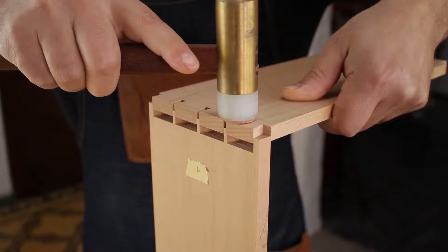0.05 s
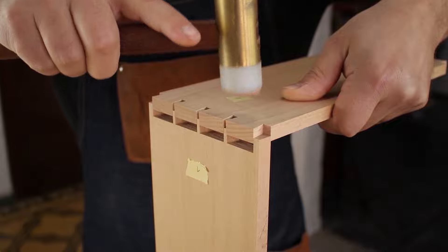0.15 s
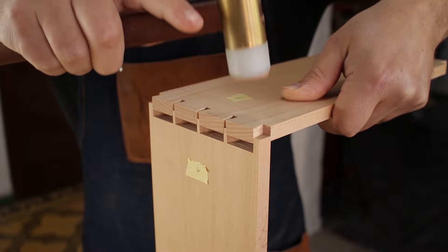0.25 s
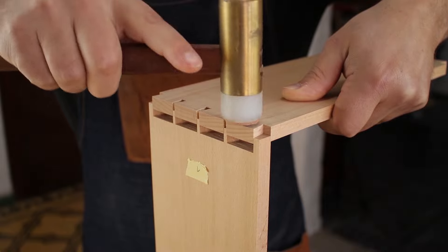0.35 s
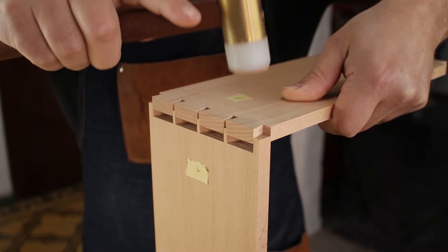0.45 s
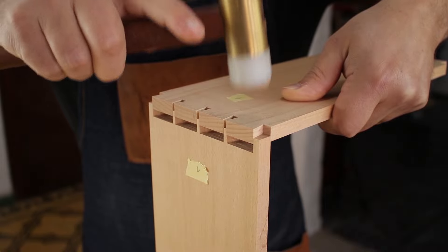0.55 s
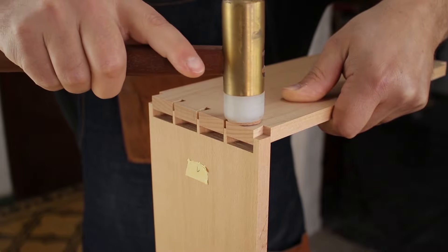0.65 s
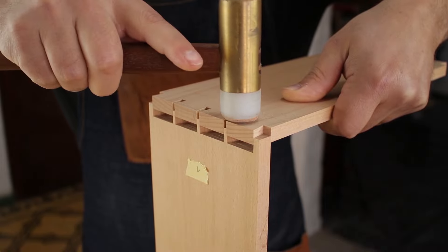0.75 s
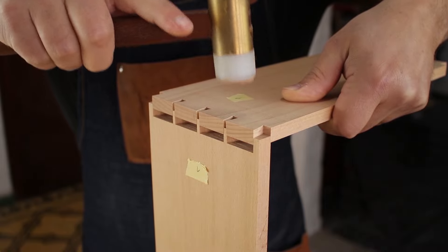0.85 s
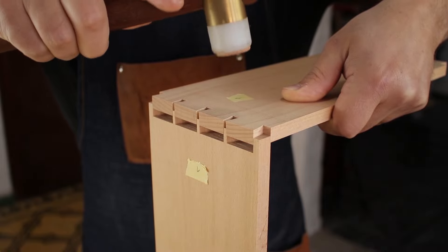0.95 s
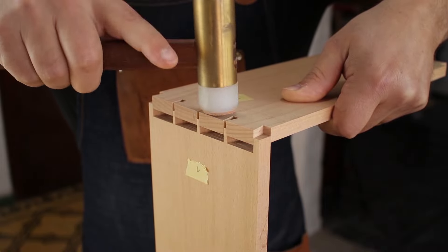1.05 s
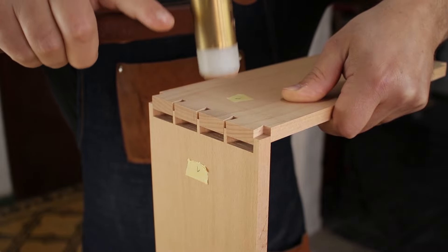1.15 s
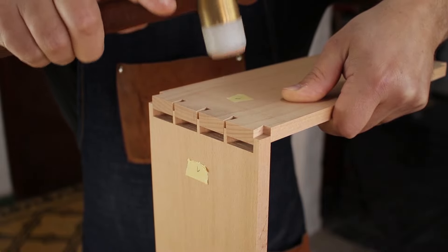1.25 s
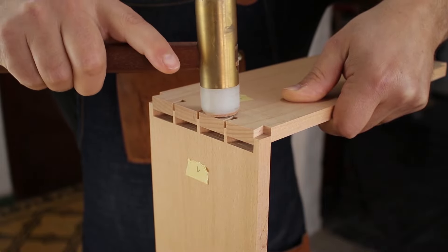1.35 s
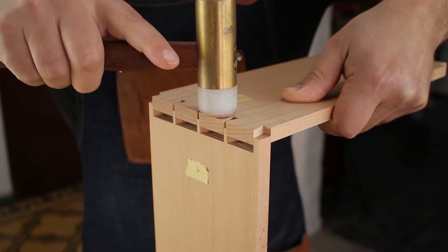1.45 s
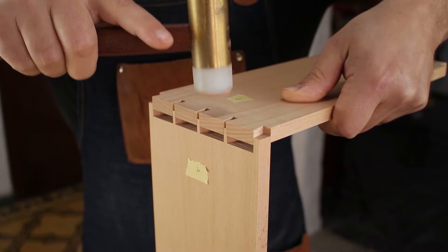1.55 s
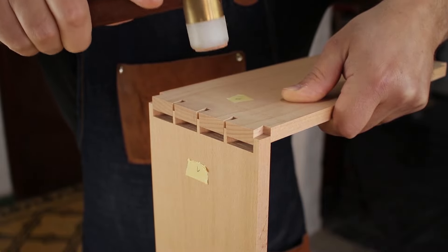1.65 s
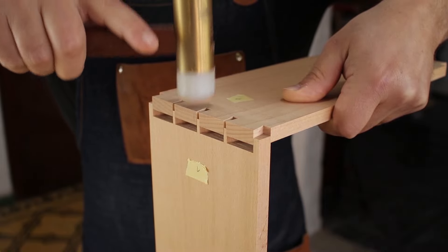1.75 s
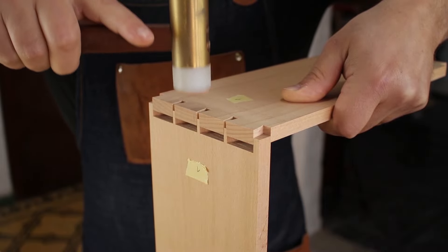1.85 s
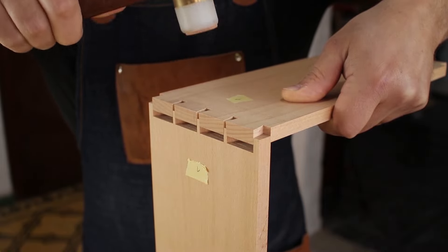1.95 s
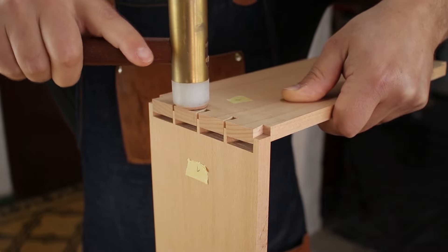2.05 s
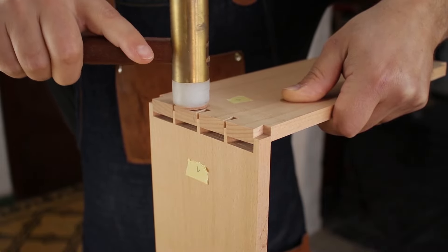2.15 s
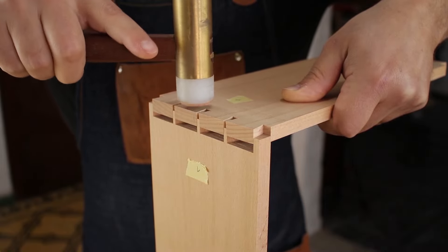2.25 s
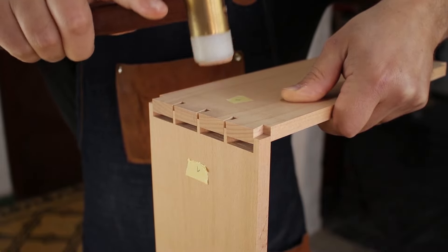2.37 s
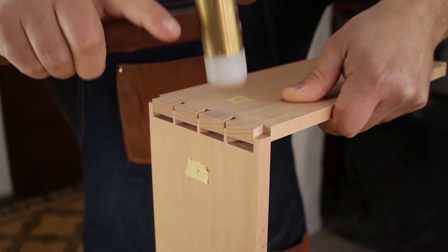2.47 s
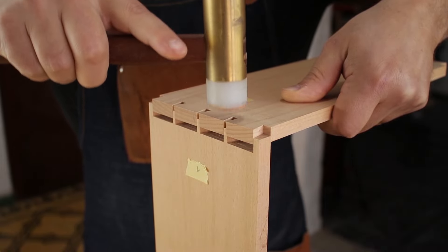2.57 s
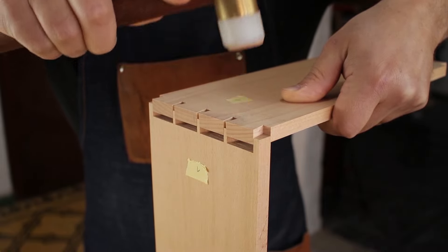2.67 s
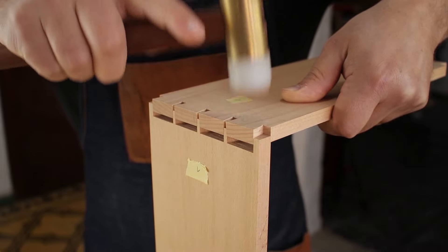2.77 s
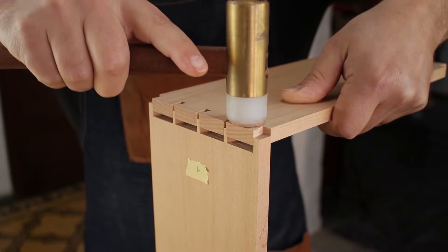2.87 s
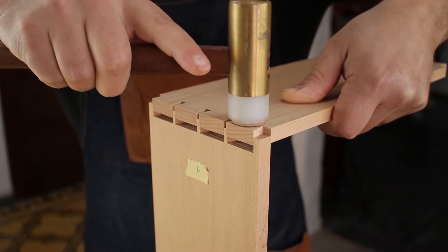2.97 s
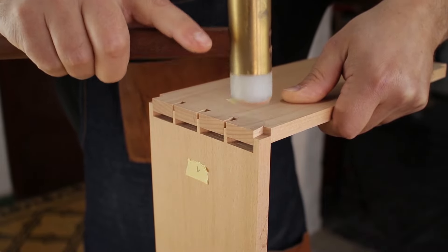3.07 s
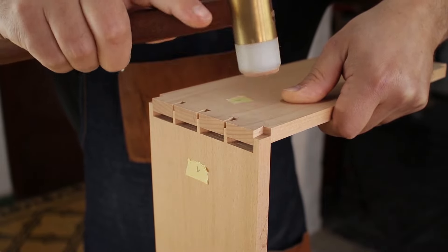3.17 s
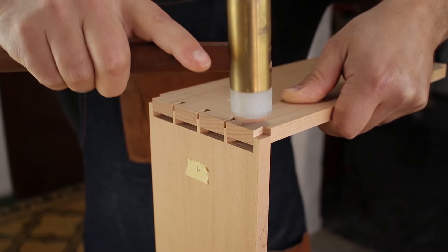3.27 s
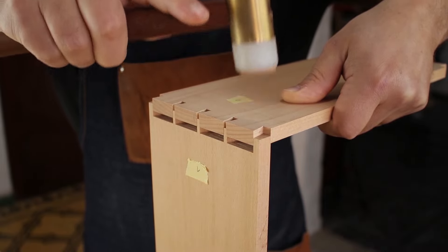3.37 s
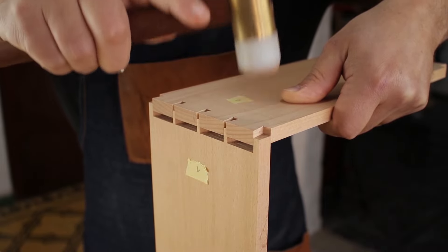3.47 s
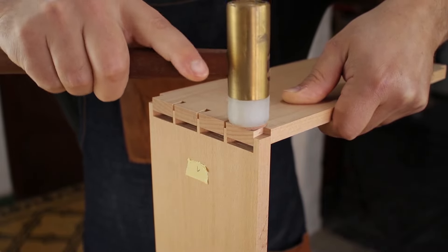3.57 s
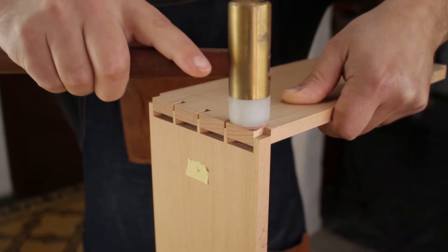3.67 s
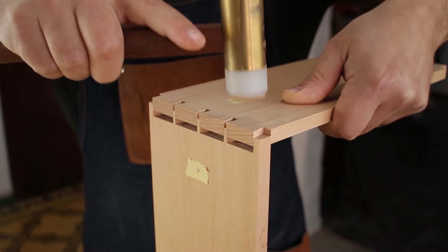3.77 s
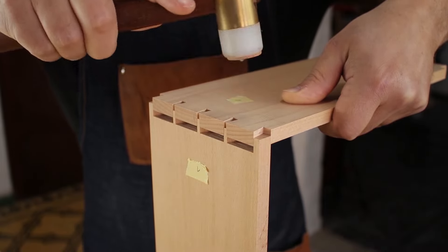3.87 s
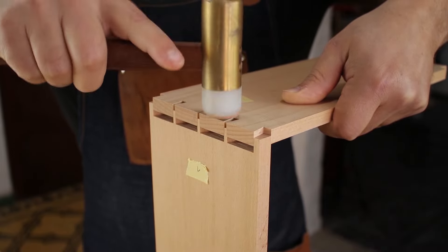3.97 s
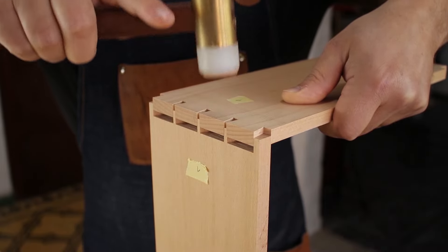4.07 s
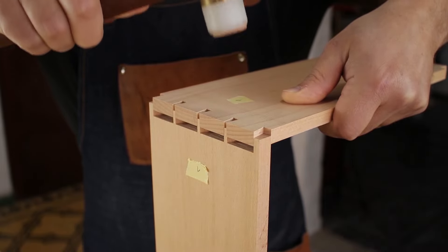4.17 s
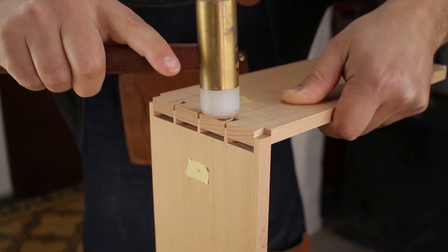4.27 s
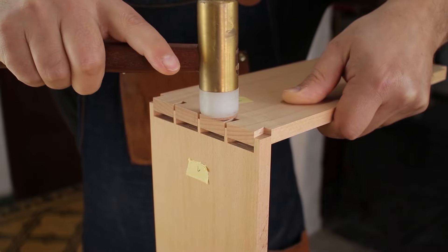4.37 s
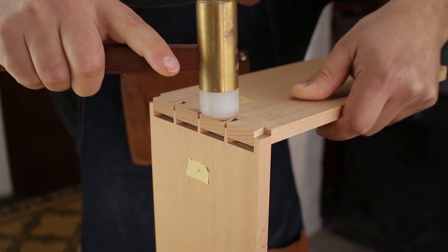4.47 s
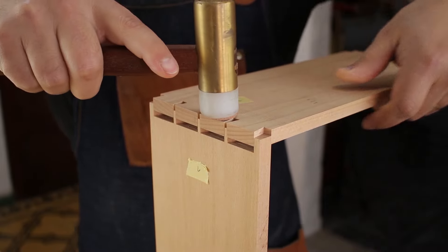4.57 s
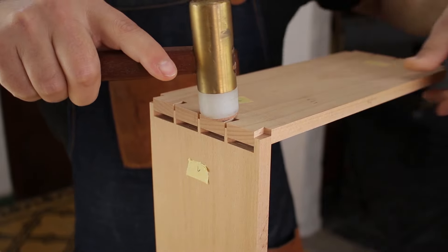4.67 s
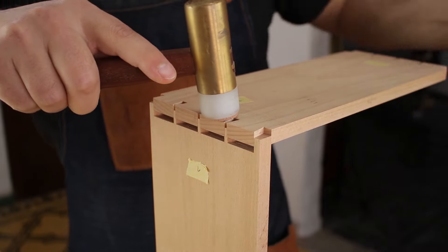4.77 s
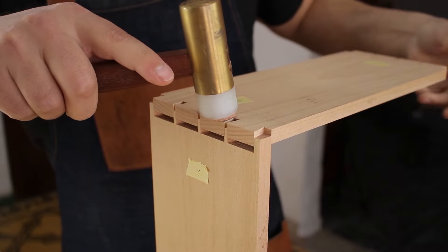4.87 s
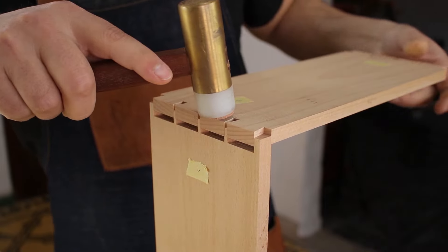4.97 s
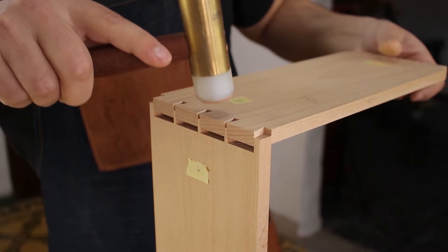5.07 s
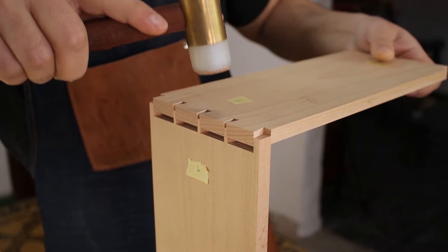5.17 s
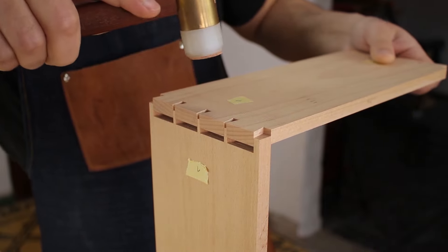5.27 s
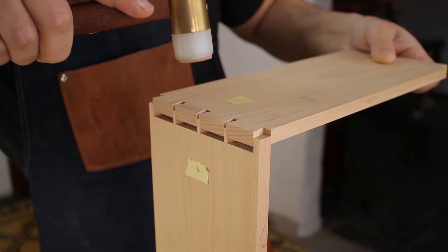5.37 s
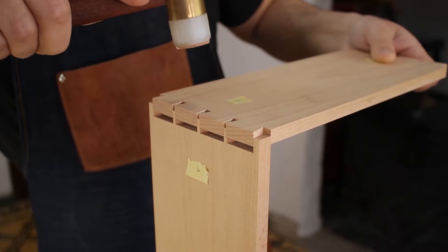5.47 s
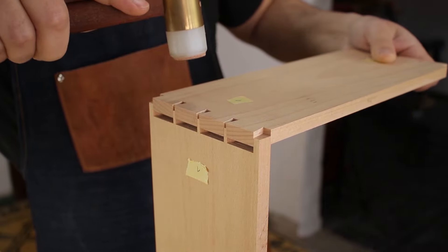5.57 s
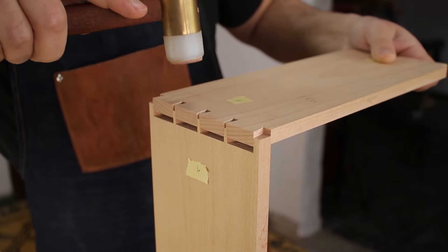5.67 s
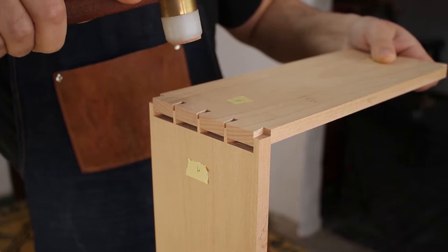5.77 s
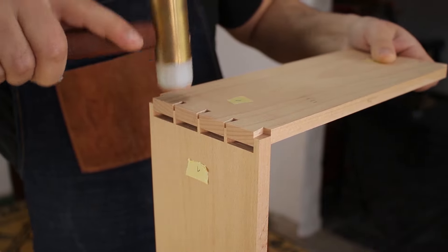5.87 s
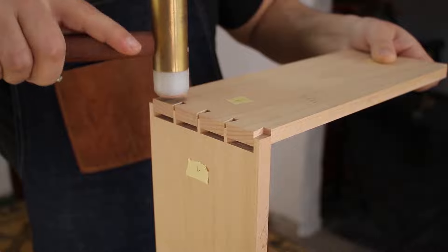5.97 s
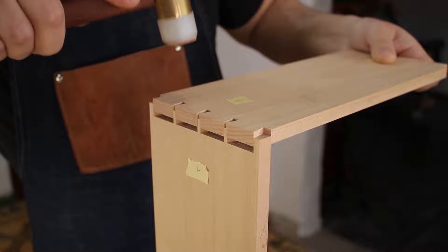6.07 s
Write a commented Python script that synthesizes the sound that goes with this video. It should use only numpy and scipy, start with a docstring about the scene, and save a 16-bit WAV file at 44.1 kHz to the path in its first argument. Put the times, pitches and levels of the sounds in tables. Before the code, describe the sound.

Hollow, woody mallet knocks on joined boards, close and slightly overloaded, echo in a bare room; a quiet pause precedes one lighter final tap.

```python
"""A nylon-faced brass mallet taps a dovetail joint home, in light and firm blows round the corner of two boards.
Each blow sums decaying board modes and a smeared click, coloured by the spot struck, and a push and thud in the bench.
A bare, live workshop answers with echoes, a noise tail and standing waves; the close microphone overloads.
In the pause before the last tap the room's answer dies away into a low rumble and a very faint squeak, both shaped noise."""
import sys
import numpy as np
from scipy import signal
from scipy.fft import rfft, irfft, next_fast_len
from scipy.io import wavfile
from scipy.ndimage import uniform_filter1d

SR = 44100
rng = np.random.default_rng(int(sys.argv[2]) if len(sys.argv) > 2 else 0)


def persist_wave(psi):
    """Save psi, clipped to +-1, as 16-bit WAV."""
    counts = np.round(np.clip(psi, -1, 1) * 32767).astype(np.int16)
    wavfile.write(sys.argv[1], SR, np.atleast_2d(counts).T)


N = 270333


def amp(db):
    """Decibels to gain."""
    return 10 ** (np.asarray(db) / 20)


def unit(x):
    """Scaled to rms 1."""
    return x / np.sqrt(np.mean(x ** 2) + 1e-20)


def along(points, hz):
    """(frequency [Hz], value) points read on a log frequency axis."""
    f, v = np.transpose(points)
    return np.interp(np.log(hz + 1), np.log(f + 1), v)


def filtered(x, response):
    """x times a zero-phase response, given as a function of frequency."""
    m = next_fast_len(len(x) + SR // 2)
    hz = np.fft.rfftfreq(m, 1 / SR)
    return irfft(rfft(x, m) * response(hz), m)[:len(x)]


def coloured(x, points, size=8192):
    """x through a causal, minimum-phase filter with the given (frequency [Hz], gain [dB]) shape."""
    gain = amp(along(points, np.fft.rfftfreq(size, 1 / SR)))
    cepstrum = irfft(np.log(gain))
    # folding the cepstrum onto positive times makes the filter causal
    cepstrum[1:size // 2] *= 2
    cepstrum[size // 2 + 1:] = 0
    impulse = irfft(np.exp(rfft(cepstrum)))
    return signal.fftconvolve(x, impulse)[:len(x)]


def fade(t, t60):
    """An exponential decay that loses 60 dB in t60 seconds."""
    return np.exp(-np.log(1000) * t / t60)


def mode(t, hz, db, t60, phase):
    """One ringing resonance: a decaying sine scaled so that its gain at its own frequency is about db."""
    start = amp(db) * 2 * np.log(1000) / (t60 * SR)  # a longer ring starts lower
    return start * fade(t, t60) * np.sin(2 * np.pi * hz * t + phase)


def mallet():
    """All blows on a time line that starts one second early, so that the room is already ringing."""
    # mallet blows, in pairs of a light tap and a firm one; a square hit is brighter, the bench thuds when the joint gives:
    # (time [s], relative force [dB], brightness [dB], relative bench thud [dB], spot struck)
    taps = [(-0.045, 2, 0, -4.5, "ringing"), (0.4088, 1, -0.5, 1, "dry"), (0.684, 2.5, -1, -2, "full"),
            (1.134, 1.5, -0.5, -6.5, "hollow"), (1.409, 3, -0.5, -1, "ringing"),
            (1.8693, 2, -5, 5.5, "dry"), (2.1548, 5.5, -9.5, 7, "full"), (2.613, 1, -7, -12.5, "hollow"),
            (2.8983, 2.5, 3.5, -1, "ringing"), (3.3449, 1.5, -10, -11.5, "dry"),
            (3.613, 3.5, 3, 15, "full"), (4.0704, -0.5, 4, -13, "hollow"),
            (4.3421, 4.8, -0.5, 4, "ringing"), (5.9954, -5, 3.5, -15, "sharp")]
    track = np.zeros(N + 2 * SR)
    for s, force_db, bright_db, thud_db, spot in taps:
        hit = blow(spot, force_db, bright_db, thud_db)
        track[round((s + 1) * SR):][:len(hit)] += hit
    return track[:N + SR]


def blow(spot, force_db, bright_db, thud_db, scatter_db=1.41, grain_db=26.5, rise=0.00015):
    """One blow: the boards' modes and a smeared click of dense upper modes, weighted by the spot that is struck."""
    # the joined boards, before scatter, spot and force: (frequency [Hz], level at resonance [dB], t60 [s])
    boards = [(238.7, 30.5, 0.087), (334.8, 33.5, 0.036), (378.6, 36.5, 0.052), (508, 30, 0.031),
              (811, 34.5, 0.054), (875, 31, 0.025), (990, 26, 0.01), (1246, 35.5, 0.02),
              (1380, 39.5, 0.037), (1427.7, 38.5, 0.056), (1598.5, 33, 0.014), (2230, 21, .012),
              (3130, 29.5, 0.0091), (3810, 17, 0.014)]
    # the dense, quickly damped upper modes of the wood: (frequency [Hz], relative level [dB])
    grain = [(100, -9.5), (600, -5), (1900, -3.5), (2500, 0), (4100, -0.5), (4900, -10), (7000, -16),
             (10000, -17), (16000, -23)]
    grain_grows = 0.4  # dB of extra upper modes per dB of force: firm blows crack, light ones ring
    t = np.arange(SR // 3) / SR
    sizes = rng.standard_normal(len(boards))  # each blow excites the modes a little differently
    ring = np.zeros(len(t))
    for k, ((hz, db, t60), size) in enumerate(zip(boards, sizes)):
        ring += mode(t, hz, db + scatter_db * size, t60, k * np.pi)  # neighbours alternate in sign
    ring *= 1 - np.exp(-t / rise)  # the soft face takes time to press in
    click = coloured(dispersed(t, spread=0.0010795, uneven_db=0.78), grain)
    wood = ring + amp(grain_db + grain_grows * force_db) * click
    return amp(force_db) * (coloured(wood, contact(spot, bright_db)) + bench(t, thud_db))


def contact(spot, bright_db):
    """The (Hz, dB) colour of a blow: the weights of its spot, tilted by how squarely the face lands."""
    # a mode struck near one of its nodes stays weak, so each spot weights the families of resonances, low to high:
    # spot: (flex [dB], knock [dB], tock [dB], clack [dB], crack [dB])
    spots = {"dry": (-3, -0.5, -1.5, -1, 2), "full": (0.5, 0, -4, -2, 2.5), "hollow": (1, 11, 0, -1, -4),
             "ringing": (1.5, 0, 3, 0, 1.35), "sharp": (4, 2, 4.5, -4, 7.5)}
    flex_db, knock_db, tock_db, clack_db, crack_db = spots[spot]
    snap_db = 0.35 * crack_db  # the share of the crack that carries on into the treble
    weights = [(25, -23.0), (130, 0.5), (170, -1),
               (225, flex_db), (250, flex_db), (290, 2), (640, 1.5),
               (770, knock_db), (830, knock_db), (1000, 3.5),
               (1200, tock_db), (1270, tock_db), (1330, clack_db), (1570, clack_db),
               (2200, crack_db), (3700, crack_db), (4500, snap_db), (6500, snap_db), (8500, -1)]
    # a shorter contact lifts the spectrum over this range
    tilt = [(1200, 0), (8500, bright_db)]
    return [(hz, db + along(tilt, hz)) for hz, db in weights]


def dispersed(t, spread, uneven_db, step_hz=300):
    """A click whose frequencies arrive at different moments and strengths, as bending waves do."""
    hz = np.fft.rfftfreq(len(t), 1 / SR)
    knots = np.arange(200) * step_hz
    delay = np.interp(hz, knots, spread * rng.gamma(2, size=len(knots)))  # seconds, 2 * spread on average
    gain = amp(uneven_db * np.interp(hz, 2 * knots, rng.standard_normal(len(knots))))
    phase = -2 * np.pi * np.cumsum(delay) * hz[1]  # delay is the slope of phase over frequency
    click = irfft(gain * np.exp(1j * phase), len(t))
    return click * (t < t[-1] / 2)  # drops what wraps round to the end


def bench(t, thud_db, push_db=17, sink_db=17):
    """The blow passes down the upright board: a short push, and a deep thud in the bench."""
    push = mode(t, 115, push_db, 0.024, np.pi / 2)
    thud = mode(t, 48, sink_db + thud_db, 0.055, 0)
    return push + thud


def workshop(x, wet_db=-1, build=0.0025, gap=0.002, settle=0.0013):
    """Boards and microphone stay put, so every blow gets the same answer: echoes, a diffuse tail and standing waves."""
    # colour of the diffuse answer: (frequency [Hz], relative level [dB])
    walls = [(30, -29), (70, -9.5), (150, -1.5), (210, 5), (330, -2), (600, 0.5), (1300, -2.5),
             (2000, -2.5), (4000, -2), (8000, -1), (16000, -8.5)]
    # how long it lasts: (frequency [Hz], t60 [s])
    decay = [(60, 0.7), (160, 0.88), (300, 1.24), (600, 0.81), (1200, 0.89), (3500, 0.74), (7500, 0.58),
             (11000, .42), (16000, 0.37)]
    # standing waves between the walls: (frequency [Hz], relative level at resonance [dB], t60 [s])
    standing = [(63, -2, .6), (87, 11, .65), (122, 11, .9), (236, 6, .45), (286, 5, .6), (330, 3, .45),
                (342, 4, .8), (385, 10, 1.15), (461, 7, .45), (592, 6, .45), (812, 3, .5), (915, 3, .7),
                (1240, 2, .4), (1381, 2, .5), (1557, 3, .4), (1792, 4, .55), (3508, 5, .5)]
    # first echoes off the bench top and the floor: (delay [s], relative level [dB])
    first_echoes = [(.0046, -15.5), (.0068, -15), (.0097, -13.5), (0.0121, -13.5)]
    # noise that decays at its own rate in each frequency band
    hz, frames, z = signal.stft(rng.standard_normal(SR * 3 // 2), SR, nperseg=512)
    tail = signal.istft(z * fade(frames, along(decay, hz)[:, None]), SR, nperseg=512)[1]
    t = np.arange(len(tail)) / SR
    since = np.maximum(t - gap, 0)
    diffuse = coloured(evened(tail * (1 - np.exp(-since / build)), size=110), walls)
    # a standing wave needs a few crossings of the room to form
    waves = sum(mode(t, *row, k * np.pi) for k, row in enumerate(standing))
    waves = (1 - np.exp(-since / settle)) * waves
    echoes = np.zeros(len(t))
    for delay, db in first_echoes:
        echoes[round(delay * SR)] += amp(db)
    return amp(wet_db) * signal.fftconvolve(x, diffuse + waves + echoes)[:len(x)]


def evened(x, size):
    """x with the broad humps of its spectrum levelled to gain 1; the ripple finer than size bins stays."""
    z = rfft(x, 2 * len(x))
    power = np.abs(uniform_filter1d(np.abs(z) ** 2, size))
    return irfft(z / np.sqrt(power + 1e-12))[:len(x)]


def squeaks(attack=0.021, release=0.71):
    """A very faint squeak in two steps, each a narrow band of noise that lingers in the room."""
    # each step starts to fade, with release as its t60, at half its length:
    # (time [s], centre [Hz], width [Hz], rms before the envelope [dB], length [s])
    squeak_steps = [(5.52, 4580, 301, -77, .14), (5.617, 3600, 600, -69, .11)]
    out = np.zeros(N)
    for s, hz, width_hz, db, length in squeak_steps:
        t = np.arange(N) / SR - s
        band = unit(filtered(rng.standard_normal(N), lambda f: 1 / (1 + (2 * (f - hz) / width_hz) ** 2)))
        swell = np.clip(t / attack, 0, 1)
        out += amp(db) * band * swell * fade(np.maximum(t - length / 2, 0), release)
    return out


def room_tone(db=-68):
    """The low rumble of the quiet shop: steady noise, weighted to the bass."""
    # colour of the rumble: (frequency [Hz], relative level [dB])
    rumble = [(20, -17.5), (55, -8.5), (88, -1.5), (115, -5.5), (145, -5.5), (240, -4.5), (400, -11),
              (1000, -18), (3800, -25), (7000, -39.5), (16000, -44)]
    return amp(db) * unit(filtered(rng.standard_normal(N), lambda hz: amp(along(rumble, hz))))


def scene(direct_db=1):
    """The close blows, the room's answer and its background."""
    taps = mallet()
    heard = (amp(direct_db) * taps + workshop(taps))[SR:]  # drops the early second
    return (heard + squeaks() + room_tone())[None]


def record(dry, low_cut_hz=30, top_hz=15900):
    """Peaks beyond full scale clip flat; then the deepest bass and the top treble are cut."""
    clipped = np.clip(dry[0], -1, 1)
    lean = signal.sosfilt(signal.butter(1, low_cut_hz, "high", fs=SR, output="sos"), clipped)
    return filtered(lean, lambda hz: 1 / (1 + (hz / top_hz) ** 100))[None]


dry = scene()
out = record(dry)
persist_wave(out)
```